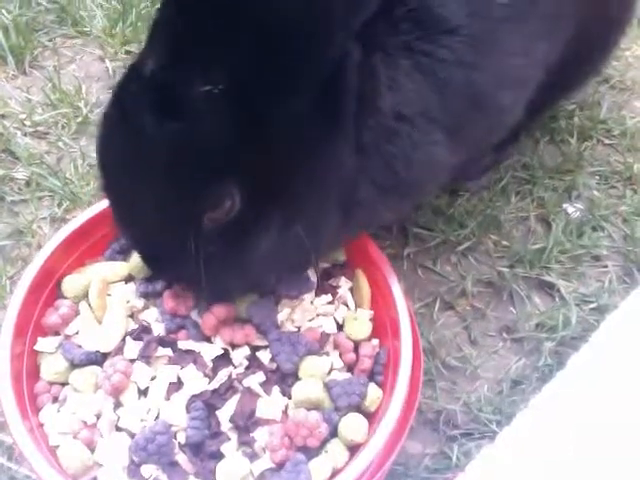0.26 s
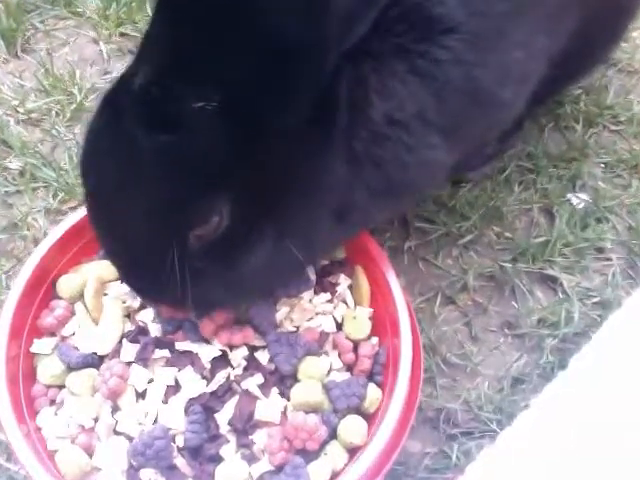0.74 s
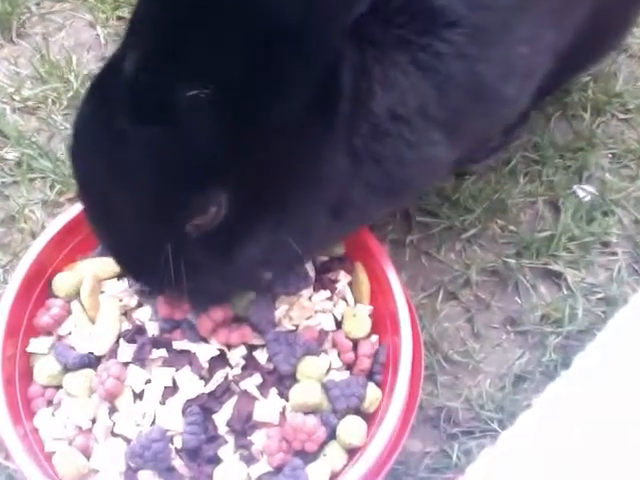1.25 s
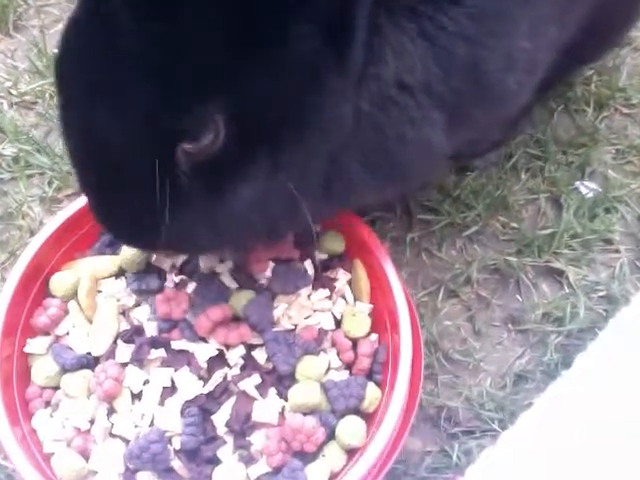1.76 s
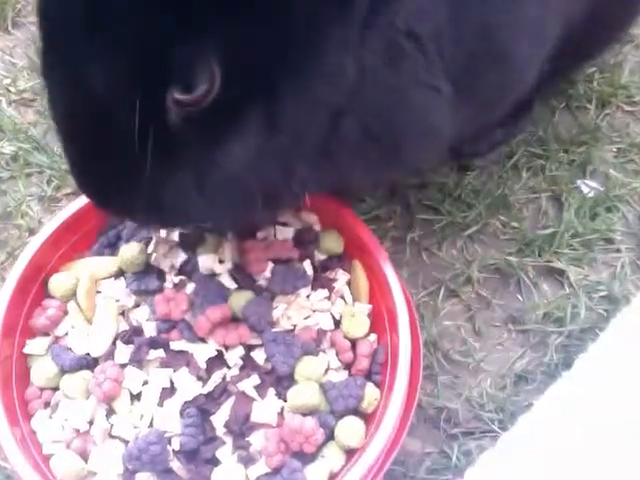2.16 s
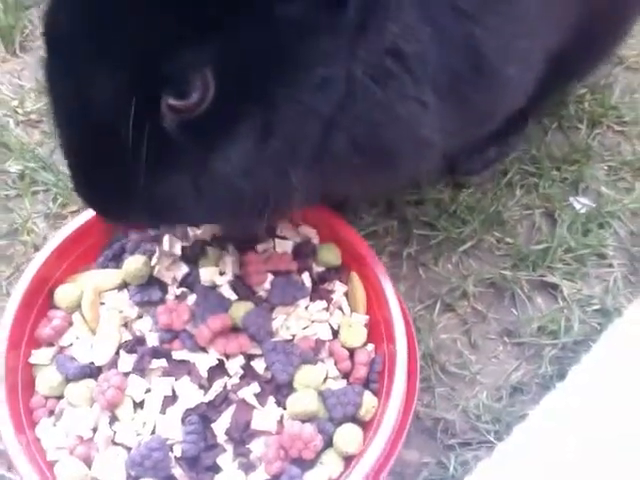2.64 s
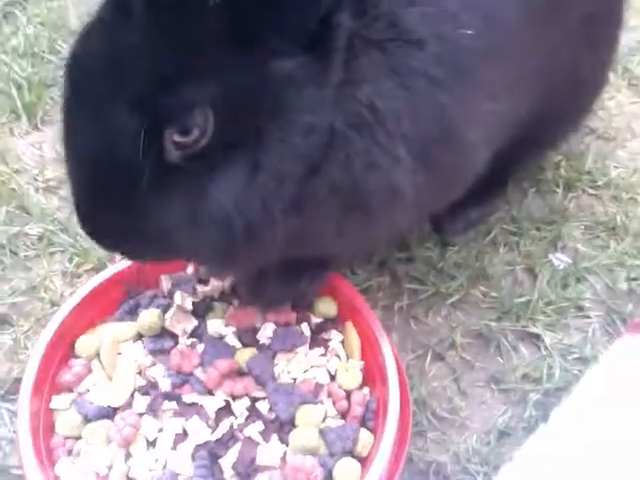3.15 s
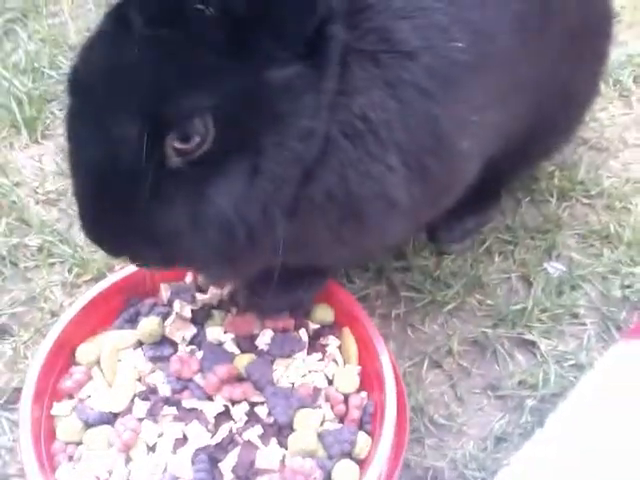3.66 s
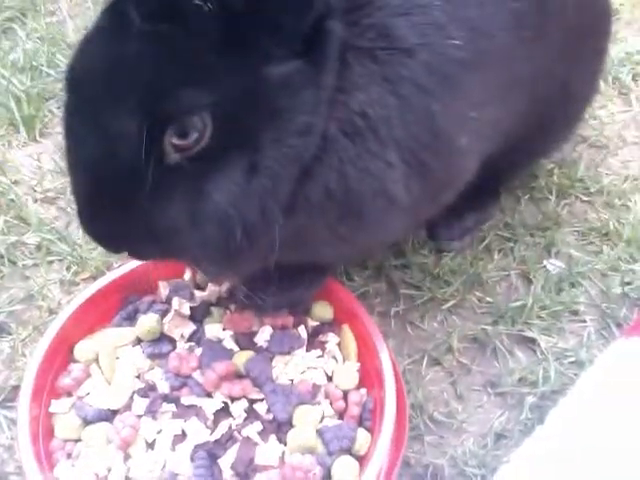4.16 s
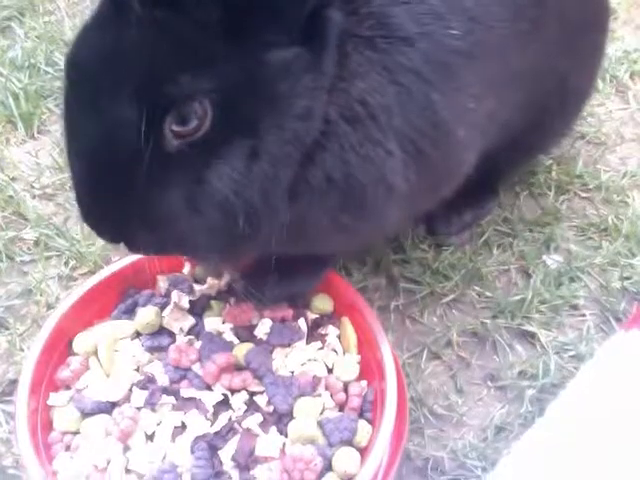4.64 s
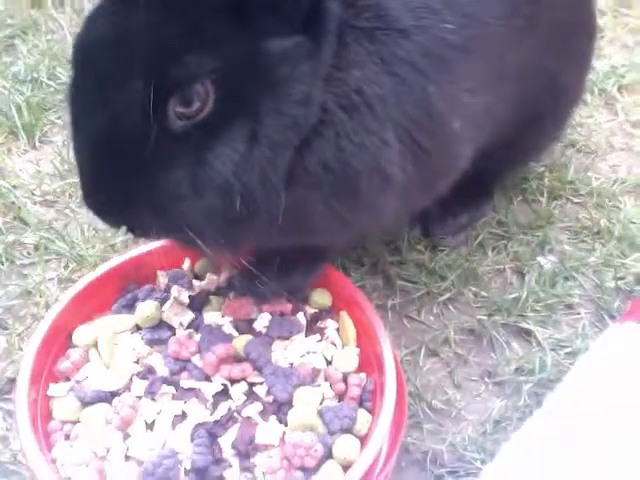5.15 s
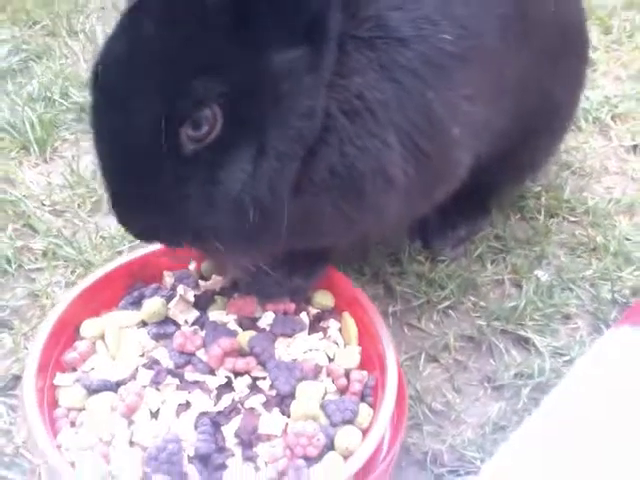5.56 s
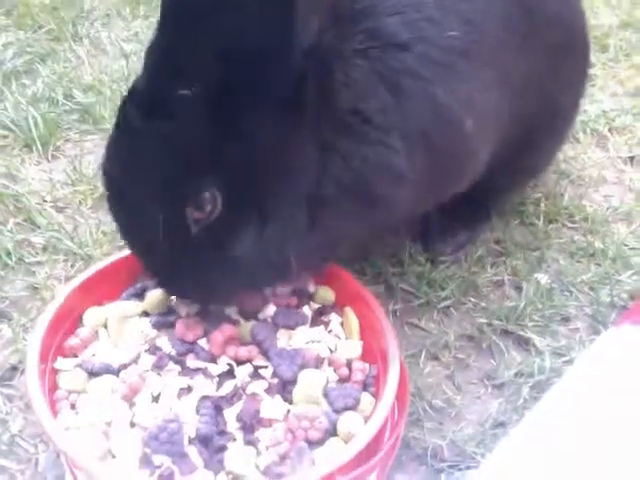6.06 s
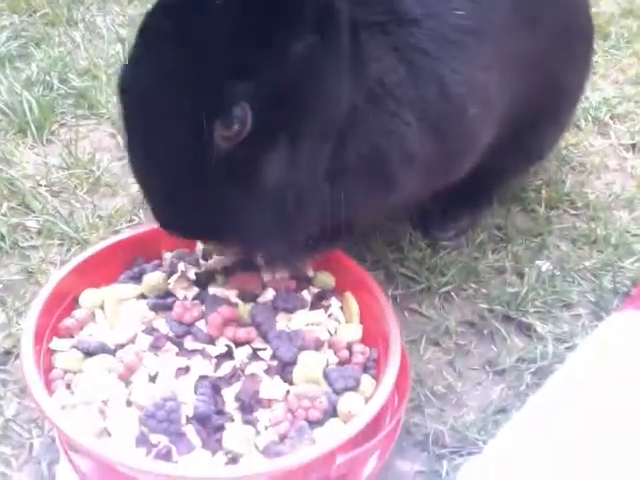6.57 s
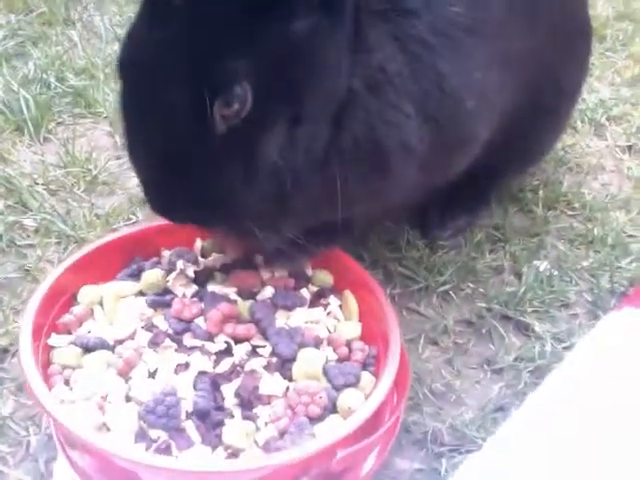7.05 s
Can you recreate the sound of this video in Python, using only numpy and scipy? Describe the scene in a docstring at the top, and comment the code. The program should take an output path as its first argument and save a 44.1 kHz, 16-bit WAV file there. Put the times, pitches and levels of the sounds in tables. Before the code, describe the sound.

A rabbit eats hard, dry treats over a plastic bowl on a lawn, very close to a phone microphone, with a faint, distant town rumble throughout. From 0 s there are light tooth ticks, small bites and jaw clacks; by about 1.3 s the crunching is stronger and regular, about five bites a second, each a crisp click followed by gritty crushing and a sliding scrape of molars. Small hollow mouth pops come in from 1 s. Between 2.2 and 2.9 s brittle crumbs snap and rattle, sharpest near 2.87 s, with a barely audible thin squeak. A hard, short, dull knock lands at 3.27 s. A very faint low hum swells from about 2 to 5.5 s under even chewing. At 5.66 s a treat cracks loudly in rapid stages on the bowl, the loudest moment. Chewing and pops continue until the end at about 7.3 s.

```python
"""A rabbit grinds dry treats five times a second over a plastic bowl on a lawn, close to a phone.
Filtered noise makes distant town noise throughout; from the start damped modes make teeth tick, bite
and clack, and showers of impulses through those modes make crumbs crush and rattle in the bowl.
From 1 s the mouth pops as a brief hollow ring; dull knocks, a swelling hum of narrow noise and
thin squeaks join from 2 s; at 5.7 s a treat cracks loudly in stages on the bowl's modes."""
import sys
import numpy as np
from scipy import signal
from scipy.fft import rfft, irfft
from scipy.io import wavfile
from scipy.ndimage import uniform_filter1d

SR = 44100
rng = np.random.default_rng(int(sys.argv[2]) if len(sys.argv) > 2 else 0)


def wav_record(signal):
    """Record a signal, one row per channel, as 16-bit PCM in the file named by sys.argv[1]."""
    frames = np.transpose(np.atleast_2d(signal))
    bounded = np.clip(frames, -1, 1)
    # unit amplitude maps onto the largest positive 16-bit level
    quanta = np.round(bounded * 32767).astype(np.int16)
    wavfile.write(sys.argv[1], SR, quanta)


N = 322362
T = np.arange(N) / SR

TOOTH_CONTACT_S, BRITTLE_CONTACT_S = .0007, .0001
CRUMB_RATE_HZ, CRUMB_SCATTER_DB = 350., 2.5


def undb(db):
    """Decibels to amplitude."""
    return 10 ** (np.asarray(db, float) / 20)


def unit(x):
    """Scales to rms 1."""
    return x / np.sqrt(np.mean(x ** 2))


def add(out, start_s, x):
    """Mixes x into out from start_s."""
    i = int(start_s * SR)
    out[i:i + len(x)] += x[:N - i]


def ring(hz, t60_s, size=2048, contact_s=TOOTH_CONTACT_S):
    """One damped mode; it swells for 1.3 cycles plus the contact time, at most 3 ms."""
    t = T[:size]
    swell_s = min(1.3 / hz + contact_s, .003)
    swell = np.sin(np.pi / 2 * np.minimum(t / swell_s, 1)) ** 2
    return swell * np.sin(2 * np.pi * hz * t) * np.exp(-np.log(1000) * t / t60_s)


def strike(modes, chance, scatter_db, detune, size=2048, contact_s=TOOTH_CONTACT_S):
    """A set of modes, each blow with its own balance and tuning; peak 1."""
    x = np.zeros(size)
    for (hz, db, t60_s), level, tuning in zip(modes, *chance):
        x += undb(db + scatter_db * level) * ring(hz * (1 + detune * tuning), t60_s, size, contact_s)
    return x / np.abs(x).max()


def grains(rate_hz, scatter_db):
    """Random impulses, a few much larger than the rest; rms 1."""
    hit = rng.random(N) < rate_hz / SR
    sign = rng.choice([-1., 1.], N)
    return unit(hit * sign * undb(scatter_db * rng.exponential(size=N)))


def resonate(envelope, modes, rate_hz, scatter_db):
    """Every mode is driven by its own rain of small impacts; rms follows the envelope."""
    shapes = [undb(db) * ring(hz, t60_s) for hz, db, t60_s in modes]
    total = np.sqrt(sum(np.sum(shape ** 2) for shape in shapes))
    out = np.zeros(N)
    for shape in shapes:
        out += signal.oaconvolve(envelope * grains(rate_hz, scatter_db), shape)[:N]
    return out / total


def walk(rate_hz):
    """Random levels held 1 / rate_hz and slewed twice; rms 1."""
    k = int(SR / rate_hz)
    steps = np.repeat(rng.standard_normal(N // k + 1), k)
    return unit(uniform_filter1d(uniform_filter1d(steps, k), k)[:N])


def narrow(hz, width_hz):
    """A thin Gaussian band of noise; rms 1."""
    offset = (np.fft.rfftfreq(N, 1 / SR) - hz) / width_hz
    return unit(irfft(rfft(rng.standard_normal(N)) * np.exp(-offset ** 2), N))


# relative town spectrum: pitch_hz, density_db_per_hz
TOWN_COLOUR = [(18, -34.5), (40, -11), (90, -1), (161, 4), (336, 0.5), (540, -6.5), (702, -5.5), (889, 1),
               (1860, -9.5), (2170, -15), (3400, -20.5), (3900, -25.5), (4500, -21.5), (5900, -25),
               (8740, -31), (13300, -40), (16000, -57.5)]
# town level: time_s, level_db
TOWN_LEVEL = [(0, -66), (.43, -69), (.85, -64.5), (2, -62.5), (4.2, -62), (4.7, -62.5), (5.8, -61.5),
              (6.6, -65), (7.31, -62.5)]
# hum level: time_s, level_db
HUM_LEVEL = [(0, -87), (1.9, -88), (2.6, -72), (3.7, -73.5), (4.2, -74), (4.8, -73), (5.4, -76.5),
             (7.31, -87.5)]
# thin steady hisses: pitch_hz, width_hz, level_db
HISSES = [(9800, 120, -101), (13100, 90, -100)]
HUM_HZ, HUM_WIDTH_HZ = 126, 6


def town():
    """Half-octave bands of far traffic and air, each wandering a little; a hum and two thin hisses."""
    hz = np.maximum(np.fft.rfftfreq(N, 1 / SR), 1)
    colour_hz, colour_db = np.transpose(TOWN_COLOUR)
    noise = rfft(rng.standard_normal(N)) * undb(np.interp(np.log(hz), np.log(colour_hz), colour_db))
    place = 2 * np.log2(hz / 25)
    out = np.zeros(N)
    for k in range(20):
        band = irfft(noise * np.maximum(1 - np.abs(place - k), 0), N)
        out += band * undb(walk(4.))
    out = unit(out) * undb(np.interp(T, *np.transpose(TOWN_LEVEL)))
    out += undb(np.interp(T, *np.transpose(HUM_LEVEL))) * narrow(HUM_HZ, HUM_WIDTH_HZ)
    for pitch_hz, width_hz, db in HISSES:
        out += undb(db) * narrow(pitch_hz, width_hz)
    return out


# tooth tips tick: start_s, enamel_db, enamel_hz, tip_over_enamel_db, cheek_over_enamel_db
TICKS = [(0.0374, -72, 6360, -17, -10), (0.0594, -69, 5800, -16, -4), (0.1424, -52, 5740, -13, -13),
         (0.4132, -48.5, 5300, -12, -4.5), (0.6474, -46, 5300, -14, -20), (0.8555, -55, 5450, -4, -1),
         (1.8839, -50.5, 5460, -17, -5), (2.0862, -52, 5030, -23, -6), (2.4299, -66, 5470, -12, -8),
         (2.4824, -56.5, 5780, -11, -6), (2.6912, -51, 5860, -12, -6), (2.7888, -47.5, 6300, -20, -10),
         (2.9644, -51, 6000, -14, -6.5), (3.0724, -57, 5850, -10, -6), (3.1609, -52, 5450, -15, -7),
         (3.2495, -60, 5470, -12, -4), (3.8508, -52, 5800, -5, -8), (4.0457, -57, 5900, -3, -4),
         (4.058, -55, 5700, -12, -11), (4.2333, -61, 5760, -5, -10), (4.2465, -52.5, 5800, -14, -6),
         (4.4282, -55.5, 5800, -10, -2), (4.6284, -54, 5400, -12, -6), (5.227, -54.5, 5720, -12, -5),
         (5.4246, -55.5, 5780, -8, -6), (5.8117, -56.5, 6020, -4, -4), (6.006, -61, 5540, -9, -6),
         (6.0174, -59.5, 5610, -12, -2), (6.2022, -52.5, 5630, -3, -9), (6.344, -53, 6500, -2, -14),
         (6.5695, -53, 5780, -13.5, -17), (6.7942, -46.5, 5540, -11, -7.5), (6.9865, -59, 5890, -14, -14),
         (7.1845, -51, 5440, -9, -6), (7.2018, -52.5, 5320, -15, -10)]
TICK_JAW_DB, TICK_CHEEK_HZ, TICK_REBOUND_DB = -7, 3276, -8.5
# jaw closes and crushes: start_s, enamel_db, enamel_hz, jaw_over_enamel_db, cheek_over_enamel_db,
# rebound_db, crunch_over_jaw_db, crunch_t60_s
BITES = [(0.0879, -51.5, 5800, 6, 12, -8, -8, 0.25), (0.3642, -58.5, 6100, 15, 17, -9, -12.5, 0.35),
         (0.5459, -61.5, 5350, 11.5, 9, -6, -16, 0.39), (0.6112, -48.5, 7440, -2, 4, -7, -13.5, 0.66),
         (0.8125, -56, 6800, 8.5, 8, -3, -15, 0.39), (0.9599, -52, 6600, 10.5, -4, -6, -14.5, 0.34),
         (1.1697, -51, 6700, 13, 1, -9, -11.5, 0.32), (1.372, -41, 6900, 6.5, -3, -11, -9.5, 0.31),
         (1.5793, -42.5, 6300, 4, -1, -7, -9.5, 0.25), (1.7842, -44, 6000, 7, 1, -5, -9.5, 0.25),
         (1.9863, -44.5, 6580, 3, -3, -7, -10.5, 0.18), (2.1942, -51, 6070, 8, 10, -6, -10, 0.17),
         (2.386, -46.5, 6100, 11, 0, -3, -10.5, 0.22), (2.5864, -43, 5830, 6.5, -5, -5, -13.5, 0.32),
         (2.794, -41.5, 6510, 2, -3, -4, -13.5, 0.28), (2.9832, -45, 6050, 11.5, 3, -4.5, -16, 0.29),
         (3.1786, -43.5, 5920, 9.5, -4, -5, -17, 0.46), (3.3715, -42.5, 6140, 10, -7, -4, -14.5, 0.22),
         (3.554, -39, 6300, 9, -3, -6.5, -15, 0.22), (3.767, -44.5, 6100, 9, -16, -4, -14.5, 0.26),
         (3.9561, -43.5, 6000, 10, -9, -4.5, -14, 0.26), (4.1487, -42, 6100, 11, 3, -9, -14, 0.26),
         (4.345, -44, 6230, 10.5, -12, -12, -13, 0.27), (4.5414, -44.5, 6100, 10.5, 2, -4, -13, 0.26),
         (4.7357, -41, 6190, 10.5, 1.5, -10, -12, 0.23), (4.9257, -41, 5940, 12.5, -0.5, -6, -16, 0.24),
         (5.1328, -45.5, 5840, 11.5, 2, -11.5, -14, 0.21), (5.3288, -46, 6100, 14, 1, -5, -16, 0.26),
         (5.525, -45.5, 5940, 14, -9, -2, -14.5, 0.23), (5.718, -44, 6010, 10.5, 3, -7, -14.5, 0.29),
         (5.9088, -50, 7120, 14.5, -11, -8, -22.5, 0.48), (6.1494, -45.5, 6340, 5, 0.5, -6, -18.5, 0.28),
         (6.344, -57.5, 6470, 7.5, 14, -5, -9, 0.27), (6.5385, -45.5, 6680, 1, -6, -2.5, -15, 0.26),
         (6.7096, -50, 6220, 12, -4, -17, -9.5, 0.27), (6.9011, -51, 5950, 16, -7, -3.5, -18.5, 0.38),
         (7.0975, -48, 6190, 14, -6, -7, -11.5, 0.33)]
BITE_CHEEK_HZ, BITE_TIP_DB = 2121, -27.5
# jaw opens with a clack in the cheek pouch: start_s, cheek_db, cheek_hz
CLACKS = [(0.198, -51.5, 2650), (0.4596, -46.5, 2660), (0.6862, -43.5, 3080), (0.8916, -44, 2440),
          (1.0978, -45, 2440), (1.3042, -49, 2430), (1.5189, -50, 2510), (1.921, -50, 2470),
          (2.13, -55, 2520), (2.5204, -50.5, 2400), (3.1048, -51, 2510), (3.2983, -46.5, 2400),
          (3.4919, -47.5, 2590), (3.6883, -53.5, 3070), (3.8851, -51, 2510), (4.0816, -49.5, 3060),
          (4.2677, -55, 2590), (4.4638, -55, 2520), (4.661, -54, 2590), (4.8587, -52, 2470),
          (5.0632, -51, 2510), (5.259, -48.5, 2520), (5.455, -48, 2660), (5.847, -54.5, 2520),
          (6.0397, -57.5, 2450), (6.2305, -52, 2670), (6.4247, -49, 2670), (6.6196, -53, 2680),
          (6.82, -49, 2680), (7.017, -52, 2680), (7.1788, -41.5, 3170), (7.212, -49, 3110)]
CLACK_JAW_DB, CLACK_ENAMEL_HZ, CLACK_ENAMEL_DB = -14.5, 5400, -10
CLACK_TIP_DB, CLACK_REBOUND_DB = -30.5, -15.5
# molars slide across: start_s, enamel_db, enamel_hz, jaw_over_enamel_db, cheek_over_enamel_db
SHEARS = [(1.0176, -56, 6940, 9.5, -1), (1.2281, -50, 6750, 7.5, -1.5), (1.4232, -45, 5970, 3, 0),
          (1.8317, -49, 6060, 5, -3), (1.8512, -47, 5730, 0, -3), (2.0413, -48.5, 5810, -2, 1),
          (2.2054, -60, 7250, 14.5, 6), (2.2548, -46.5, 5460, -11, -4.5), (2.3974, -63, 5920, 10, -1.5),
          (2.4553, -50, 5460, -1, 0.5), (2.6349, -56, 5890, 8, -1.5), (2.6579, -44.5, 5890, -6, -0.5),
          (2.826, -55.5, 5970, 15, 3), (2.8499, -41.5, 6000, -3, -1), (3.0505, -47, 5810, -11, -1.5),
          (3.2126, -53.5, 7400, 11, 4), (3.3972, -46.5, 5890, 11, 0), (3.4421, -56, 5300, -1, 1),
          (3.6406, -60, 5480, 8, 1), (3.7993, -46.5, 5890, 8.5, 2.5), (3.9868, -45.5, 5900, 10, 2),
          (4.1739, -42.5, 6230, 5, 0), (4.373, -47.5, 5900, 11.5, 1), (4.5695, -44, 6070, 7, -3),
          (4.7601, -46, 7000, 11.5, -1), (4.9616, -51.5, 6260, 16, -7), (5.1652, -49, 6330, 12, 1.5),
          (5.3627, -47.5, 6330, 10, -4), (5.5513, -45, 6330, 5.5, 0), (5.5892, -49.5, 5820, 4, -3.5),
          (5.7488, -46.5, 6390, 9, -6), (5.7823, -43.5, 5980, 0.5, -5), (5.9504, -48, 6280, 2.5, -16),
          (5.9818, -50.5, 5810, -5, -10), (6.1719, -46, 5840, -10, -12), (6.3609, -44.5, 5840, -4, -6),
          (6.7321, -38, 6220, 4, -10), (6.7555, -44.5, 5850, 3, -1.5), (6.9282, -42.5, 6530, 5.5, -9),
          (6.9651, -50, 5850, 1, -8), (7.1207, -42.5, 6320, 5, -5), (7.1432, -44, 5300, 2, -3)]
SHEAR_CHEEK_HZ, SHEAR_TIP_DB, SHEAR_REBOUND_DB = 2400, -23.5, -12
# hard crumbs snap: start_s, cheek_db, cheek_hz, jaw_over_cheek_db, rebound_db
SNAPS = [(2.1898, -44.5, 4500, -1, -4), (2.271, -44, 4470, -7, -13), (2.285, -51, 4770, -12, -7),
         (2.3211, -47, 4360, 1.5, 0), (2.7177, -41, 4360, -17, -21), (2.796, -44, 4560, 1, -17),
         (2.8725, -31.5, 4400, -6.5, -6), (5.7077, -32.5, 4680, -14, -18)]
SNAP_ENAMEL_HZ, SNAP_ENAMEL_DB, SNAP_TIP_DB = 4700, -4.5, -20.5


def contacts():
    """Tooth contacts: start_s, jaw_db, cheek_db, cheek_hz, enamel_db, enamel_hz, tip_db, rebound_db."""
    rows = []
    for s, db, hz, tip, cheek in TICKS:
        rows.append((s, db + TICK_JAW_DB, db + cheek, TICK_CHEEK_HZ, db, hz, db + tip, TICK_REBOUND_DB))
    for s, db, hz, jaw, cheek, rebound, _, _ in BITES:
        rows.append((s, db + jaw, db + cheek, BITE_CHEEK_HZ, db, hz, db + BITE_TIP_DB, rebound))
    for s, db, hz in CLACKS:
        rows.append((s, db + CLACK_JAW_DB, db, hz, db + CLACK_ENAMEL_DB, CLACK_ENAMEL_HZ,
                     db + CLACK_TIP_DB, CLACK_REBOUND_DB))
    for s, db, hz, jaw, cheek in SHEARS:
        rows.append((s, db + jaw, db + cheek, SHEAR_CHEEK_HZ, db, hz,
                     db + SHEAR_TIP_DB, SHEAR_REBOUND_DB))
    for s, db, hz, jaw, rebound in SNAPS:
        rows.append((s, db + jaw, db, hz, db + SNAP_ENAMEL_DB, SNAP_ENAMEL_HZ,
                     db + SNAP_TIP_DB, rebound))
    return rows


# jaw modes: pitch_hz, level_db, t60_s
JAW = [(1017.6, 0, 0.05), (1295, 5.5, 0.022), (1545, 10, 0.019), (1851, 8, 0.024)]
# enamel modes: pitch_hz, level_db, t60_s
ENAMEL = [(5030, -1.5, 0.005), (5800, 5, 0.0044), (6440, 1.5, 0.0041), (6950, -1, .007), (7454, 0.5, .007),
          (8010, -1.5, .005)]
# tooth tip modes: pitch_hz, level_db, t60_s
TIP = [(10000, 7, .008), (11900, 5.5, .006), (13100, 7, 0.0064), (13800, 5.5, 0.0038)]
CHEEK_T60_S = .009
FOCUS_DB_PER_OCTAVE, REBOUND_FOCUS_DB_PER_OCTAVE = 29.5, 70
PLACE_DB, PLACE_T60_S = -5.5, 0.01  # ring at the pitch of the contact itself, over enamel
REBOUND_S, REBOUND_HZ, REBOUND_TREBLE_DB, REBOUND_TIP_DB = .012, 5900, -4.5, -7
CRACKLE_DB, CRACKLE_T60_S = -26.5, 0.15


def tooth(place_hz, focus_db_per_octave, chance):
    """The place of contact favours the enamel modes near one pitch and adds a ring of its own."""
    enamel = [(hz, db - focus_db_per_octave * abs(np.log2(hz / place_hz)), t60_s)
              for hz, db, t60_s in ENAMEL]
    return strike(enamel, chance, 2.5, .03) + undb(PLACE_DB) * ring(place_hz, PLACE_T60_S)


def clicks():
    """Each contact rings jaw, cheek pouch, enamel and tip in proportion, rebounds, sheds crackle."""
    out, shed = np.zeros((2, N))
    rows = contacts()
    chance = rng.standard_normal((len(rows), 2, 3, 2, len(ENAMEL)))
    for row, (first, second) in zip(rows, chance):
        s, jaw_db, cheek_db, cheek_hz, enamel_db, enamel_hz, tip_db, rebound_db = row
        cheek = ring(cheek_hz, CHEEK_T60_S)
        cheek = undb(cheek_db) * cheek / cheek.max()
        # start_s, force_db, place_hz, focus_db_per_octave, treble_db, tip_db, chance
        blows = [(s, 0, enamel_hz, FOCUS_DB_PER_OCTAVE, 0, 0, first),
                 (s + REBOUND_S, rebound_db, REBOUND_HZ, REBOUND_FOCUS_DB_PER_OCTAVE,
                  REBOUND_TREBLE_DB, REBOUND_TIP_DB, second)]
        for at, force_db, place_hz, focus, treble_db, tip_cut_db, c in blows:
            bright = undb(enamel_db + treble_db) * tooth(place_hz, focus, c[1])
            bright += undb(tip_db + tip_cut_db) * strike(TIP, c[2], 4., .03)
            add(out, at + .0005, undb(force_db + jaw_db) * strike(JAW, c[0], 2.5, .05))
            add(out, at, undb(force_db) * (cheek + bright))
        add(shed, s, undb(enamel_db + CRACKLE_DB - 60 * T[:SR // 8] / CRACKLE_T60_S))
    return out + resonate(shed, ENAMEL[:3], CRUMB_RATE_HZ, CRUMB_SCATTER_DB)


# soft crumb modes: pitch_hz, level_db, t60_s
RUSTLE = [(5350, 1, .015), (5750, -1, .012), (3150, 0, .012)]
RUSTLE_DB, RUSTLE_T60_S = -19, .2


def rustle():
    """Crumbs rustle softly after each tick: a fading shower of small impacts."""
    force = np.zeros(N)
    for s, enamel_db, *_ in TICKS:
        add(force, s, undb(enamel_db + RUSTLE_DB - 60 * T[:SR // 8] / RUSTLE_T60_S))
    return resonate(force, RUSTLE, CRUMB_RATE_HZ, CRUMB_SCATTER_DB)


PALATE_HZ, PALATE_T60_S, PALATE_DB = 3460, 0.0099, -6.5  # level over enamel


def palate():
    """One mode rung by each bite and its rebound, with random level and tuning."""
    out = np.zeros(N)
    for s, enamel_db, *_ in BITES:
        for at in (s, s + REBOUND_S):
            level, tuning = rng.standard_normal(2)
            tone = ring(PALATE_HZ * (1 + 0.055 * tuning), PALATE_T60_S)
            add(out, at, undb(enamel_db + PALATE_DB + 3.1 * level) * tone)
    return out


# cheek modes: pitch_hz, level_db, t60_s
CHEEK = [(2930, 5, 0.008), (3750, 8.5, 0.0061), (4320, -3.5, 0.014)]
PRESS_S, SINK_S, CRUNCH_TREBLE_DB = .045, .03, -22


def strokes(delay_s, hold_s, gain_db=0):
    """Crushing force of every bite: a quick rise, a steady hold, then a fade."""
    t = T[:SR // 4]
    force = np.zeros(N)
    for s, enamel_db, _, jaw_db, _, _, crunch_db, t60_s in BITES:
        fade_db = 60 * np.maximum(t - hold_s, 0) / t60_s
        level = undb(enamel_db + jaw_db + crunch_db + gain_db - fade_db)
        add(force, s + delay_s, np.minimum(t / 0.0027, 1) * level)
    return force


def grinding():
    """Crumbs break under the molars: steady while the jaw presses, then dying away."""
    treble = strokes(0, PRESS_S, CRUNCH_TREBLE_DB)
    out = resonate(treble, CHEEK + ENAMEL[:2], CRUMB_RATE_HZ, CRUMB_SCATTER_DB)
    for k, mode in enumerate(JAW[::-1]):
        # the crunch sinks: lower modes join later and high ones give out sooner as the jaw closes
        low = k / (len(JAW) - 1)
        force = strokes(SINK_S * low ** 2, PRESS_S * (0.16 + 0.092 * low))
        out += undb(mode[1] - 15.0) * resonate(force, [mode], CRUMB_RATE_HZ, CRUMB_SCATTER_DB)
    return out


# plastic bowl modes: pitch_hz, level_db, t60_s
BOWL = [(204, -7, 0.053), (265, -15.5, 0.078), (448, -19, 0.076), (656, -19, 0.047), (862, -12.5, 0.058),
        (1214, 8, 0.017), (1510, 2, 0.033), (1754, 9, 0.017), (2092, -4.5, 0.02), (2530, -0.5, 0.018),
        (3020, -5, 0.0082), (3870, -23.5, 0.0027), (4180, -6, 0.0063), (4610, -15, 0.021),
        (4930, -6.5, .01), (5900, -15.5, .007), (6020, -3.5, .008), (6920, -8, 0.009), (8000, -19.5, 0.006),
        (9580, -17, 0.0086), (11400, -14.5, 0.0039), (12330, -25.5, 0.0036), (14040, -24.5, 0.0028),
        (15400, -27.5, 0.0036)]
BOWL_TREBLE_HZ = 2800
BOWL_LOW = [mode for mode in BOWL if mode[0] <= BOWL_TREBLE_HZ]
BOWL_HIGH = [mode for mode in BOWL if mode[0] > BOWL_TREBLE_HZ]
# crumbs rattle in the bowl: start_s, rise_s, t60_s, level_db
RATTLES = [(.21, 0.02, 0.12, -78), (2.18, 0.031, 0.035, -66), (2.325, 0.013, 0.035, -55),
           (2.352, 0.0073, 0.13, -64.5), (2.707, 0.0067, 0.14, -61.5), (2.864, 0.012, 0.03, -38.5),
           (2.89, 0.0087, 0.18, -59.5), (5.664, 0.0031, 0.068, -35.5), (5.692, .01, 0.16, -74)]
RATTLE_RATE_HZ = 1500.


def rattle():
    """Crumbs shower the bowl's upper modes and two of its lower ones."""
    shake, t = np.zeros(N), T[:SR // 4]
    for s, rise_s, t60_s, db in RATTLES:
        fade_db = 60 * np.maximum(t - rise_s, 0) / t60_s
        add(shake, s, np.minimum(t / rise_s, 1) * undb(db - fade_db))
    low = undb(1.5) * resonate(shake, BOWL_LOW[-3:-1], RATTLE_RATE_HZ, 3.)
    return low + resonate(shake, BOWL_HIGH, RATTLE_RATE_HZ, 0.9)


# hollow pops of the mouth: start_s, level_db, pitch_hz, hold_s
POPS = [(1.001, -59, 307, 0.014), (1.263, -45.5, 337, 0.014), (1.471, -50.5, 340, 0.018),
        (1.67, -58, 344, 0.017), (1.856, -48.5, 344, 0.03), (2.042, -50, 347, 0.014),
        (2.087, -41, 337, 0.0057), (2.258, -54, 332, 0.024), (2.454, -54, 334, 0.016),
        (2.658, -46.5, 332, 0.0045), (2.853, -47, 333, 0.0079), (3.056, -50, 342, 0.046),
        (3.251, -51, 323, 0.026), (3.461, -47.5, 340, 0.026), (3.656, -54, 343, 0.019),
        (4.629, -47, 340, 0.013), (4.805, -54.5, 317, 0.018), (5.026, -49.5, 340, 0.027),
        (5.784, -53, 324, 0.028), (6.006, -46, 338, 0.02), (6.201, -49, 341, 0.014),
        (6.359, -52, 338, 0.014), (6.401, -46, 337, 0.011), (6.754, -50, 346, 0.021),
        (6.795, -40, 338, 0.0098), (6.986, -43.5, 336, 0.017), (7.145, -53.5, 350, 0.039)]
POP_T60_S, POP_FADE_S = 0.11, 0.025  # the fade is a 1/e time


def pops():
    """The mouth cavity rings a few cycles, then the lips close it."""
    out, t = np.zeros(N), T[:2048]
    for s, db, hz, hold_s in POPS:
        closing = np.exp(-np.maximum(t - hold_s, 0) / POP_FADE_S)
        add(out, s, undb(db) * ring(hz, POP_T60_S) * closing)
    return out


# dull knocks: start_s, level_db, pitch_hz, t60_s
KNOCKS = [(3.271, -7.5, 1290, 0.0036), (7.179, -27, 1720, 0.017), (2.273, -39, 680, 0.019)]


def knocks():
    """Inverted damped sines that swell over one cycle."""
    out, t = np.zeros(N), T[:2048]
    for s, db, hz, t60_s in KNOCKS:
        swell = np.minimum(t * hz, 1) ** 2
        add(out, s, -undb(db) * np.sin(2 * np.pi * hz * t) * swell * undb(-60 * t / t60_s))
    return out


# thin wavering squeaks: start_s, length_s, pitch_hz, level_db
SQUEAKS = [(2.916, 0.031, 7560, -69), (2.923, .07, 8500, -76)]


def squeaks():
    """Faint high tones of narrow noise that flutter in level."""
    out = np.zeros(N)
    for s, length_s, hz, db in SQUEAKS:
        shape = np.hanning(int(length_s * SR)) ** .3
        add(out, s, undb(db) * shape * narrow(hz, 120)[:len(shape)])
    return out


# a treat cracks against the bowl in stages: start_s, level_db, treble_over_level_db
CRACK = [(5.6581, -17, -16), (5.6599, -25, 1), (5.6618, -6, -3), (5.667, -20.5, 0), (5.6704, -21.5, -3),
         (5.676, -34, 10.5), (5.682, -35, 5), (5.6865, -38.5, 8.5), (5.69, -42, 5)]


def crack():
    """Each stage of the crack strikes the bowl's low and high modes with a brittle contact."""
    out = np.zeros(N)
    chance = rng.standard_normal((len(CRACK), 2, len(BOWL)))
    for (s, db, treble_db), c in zip(CRACK, chance):
        low = strike(BOWL_LOW, c, 1., .01, size=8192, contact_s=BRITTLE_CONTACT_S)
        high = strike(BOWL_HIGH, c[:, len(BOWL_LOW):], 2.5, 0.04, contact_s=BRITTLE_CONTACT_S)
        add(out, s, undb(db) * low)
        add(out, s, undb(db + treble_db + 1.5) * high)
    return out


TAIL_DB, TAIL_T60_S = -28.5, 0.46


def space(near):
    """A short scattered tail from bowl, fur and ground: fading noise after the direct sound."""
    t = T[:SR // 4]
    tail = unit(rng.standard_normal(len(t)) * undb(-60 * t / TAIL_T60_S))
    response = tail * undb(TAIL_DB) / np.sqrt(len(t))
    response[0] = 1
    return signal.fftconvolve(near, response)[:N]


def scene():
    """Near sounds with their tail over the town."""
    far = town()
    near = clicks() + rustle() + palate() + grinding() + rattle()
    near += pops() + knocks() + squeaks() + crack()
    return (space(near) + far)[None]


def record(dry):
    """The phone drops the lowest bass, dulls the highest treble and cuts the top."""
    x = signal.sosfilt(signal.butter(3, 48, "high", fs=SR, output="sos"), dry)
    x = signal.sosfilt(signal.butter(4, 13800, fs=SR, output="sos"), x)
    return signal.sosfilt(signal.ellip(8, .2, 70, 16400, fs=SR, output="sos"), x)


dry = scene()
out = record(dry)
wav_record(out)
```